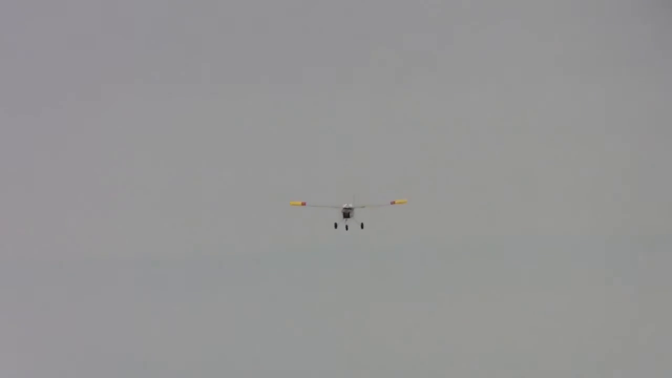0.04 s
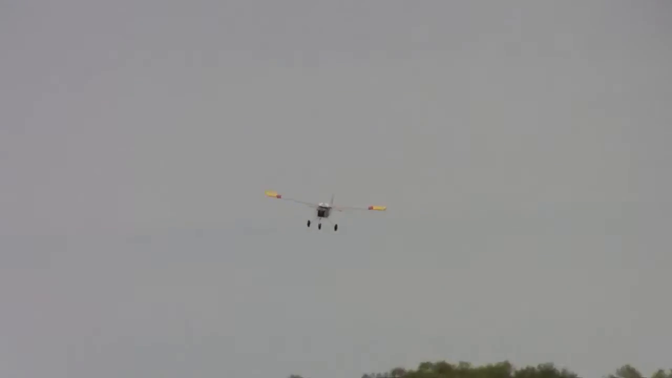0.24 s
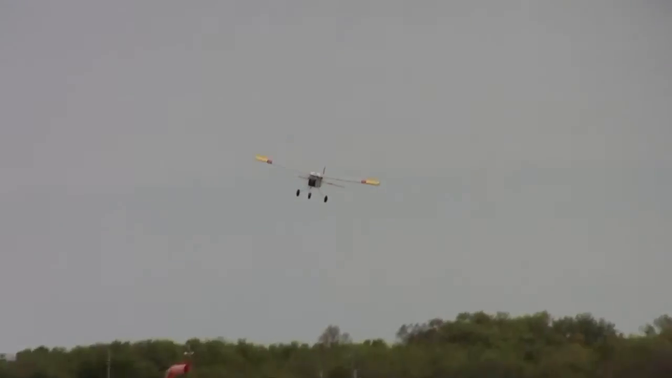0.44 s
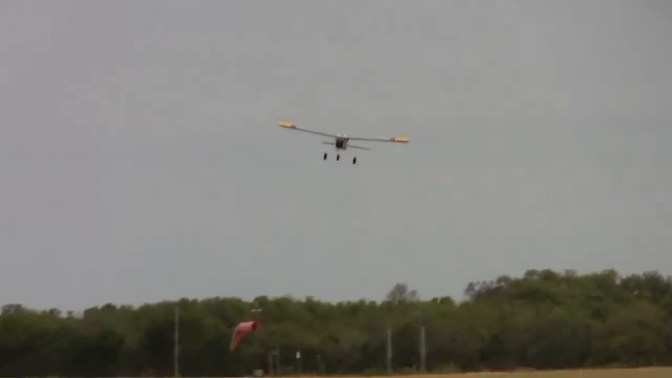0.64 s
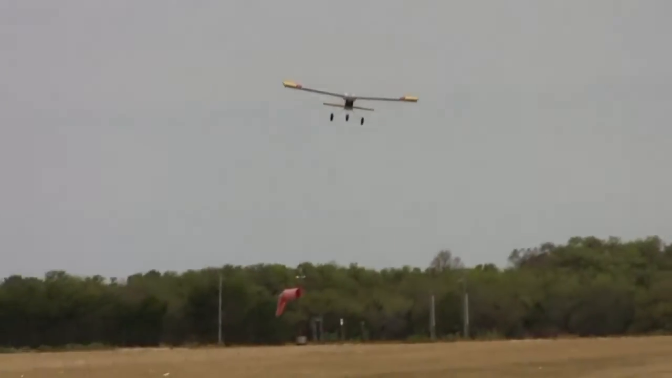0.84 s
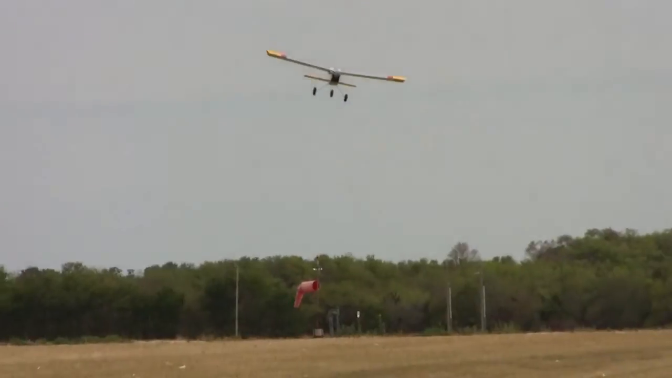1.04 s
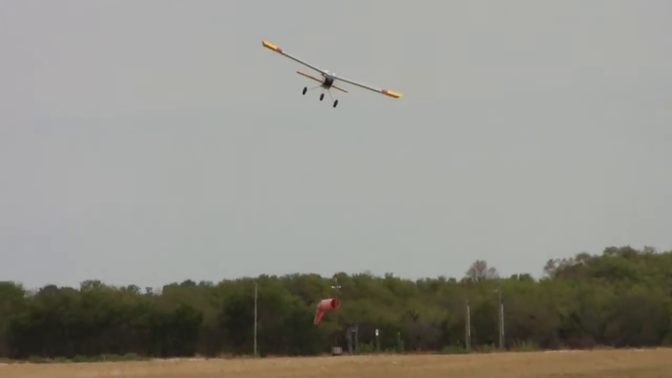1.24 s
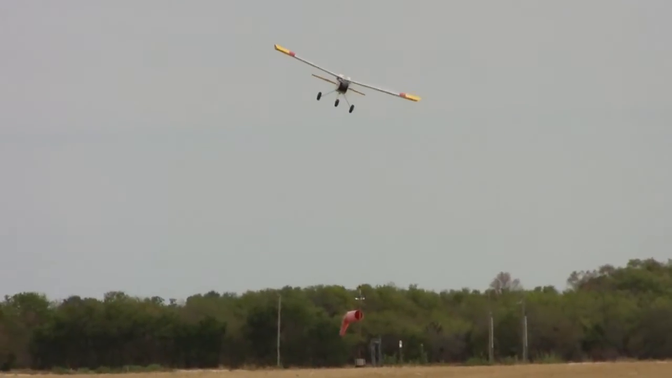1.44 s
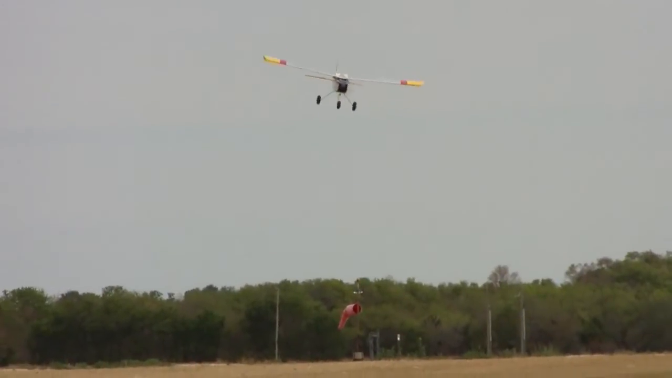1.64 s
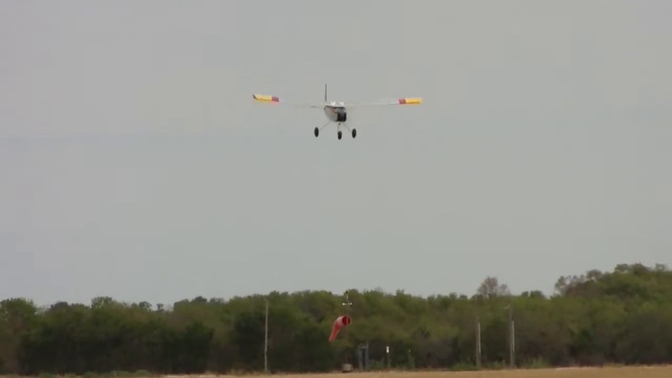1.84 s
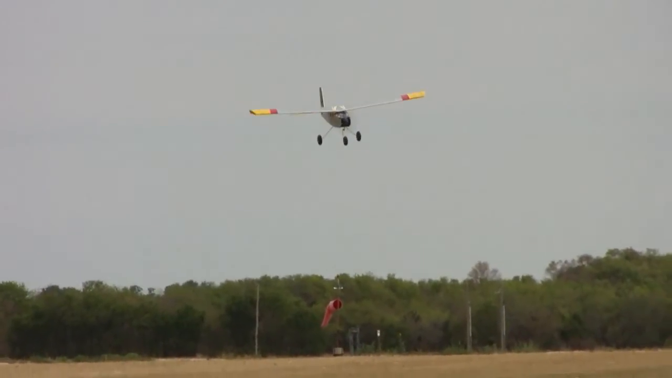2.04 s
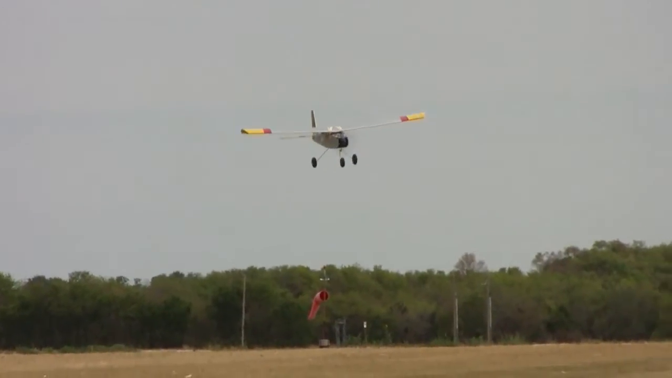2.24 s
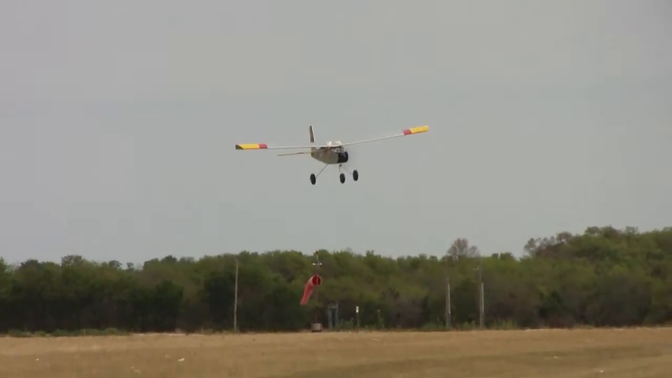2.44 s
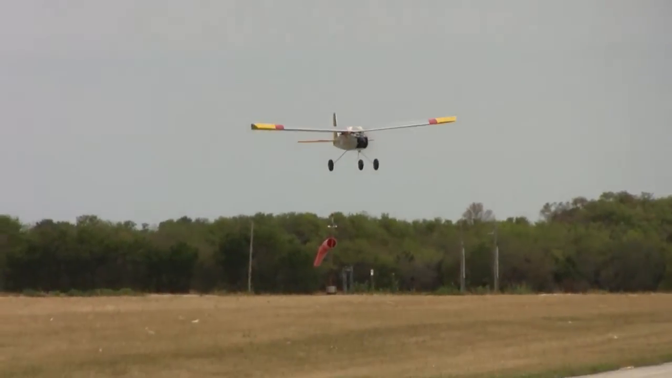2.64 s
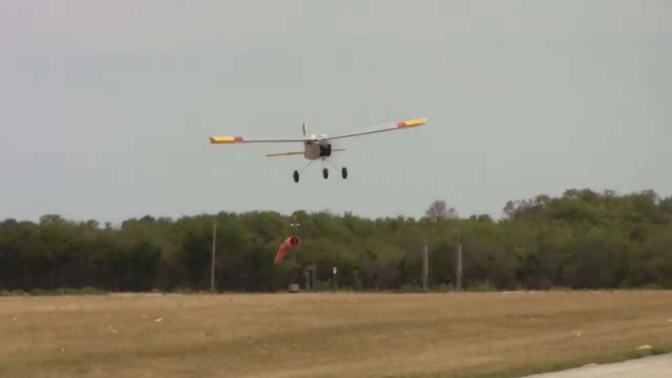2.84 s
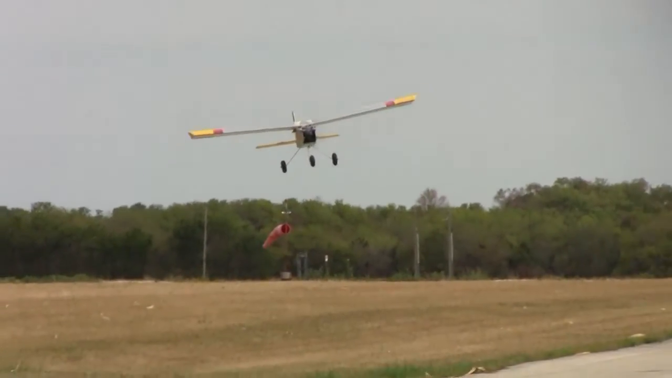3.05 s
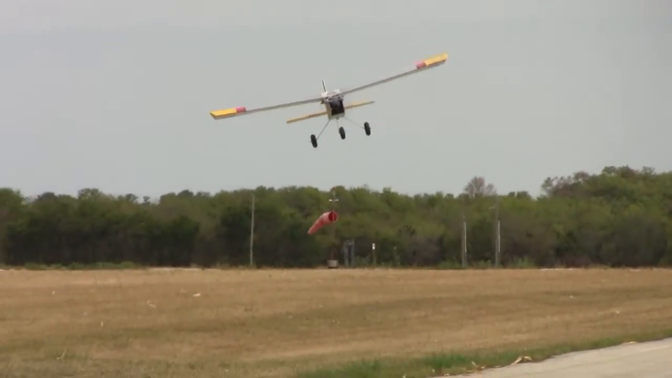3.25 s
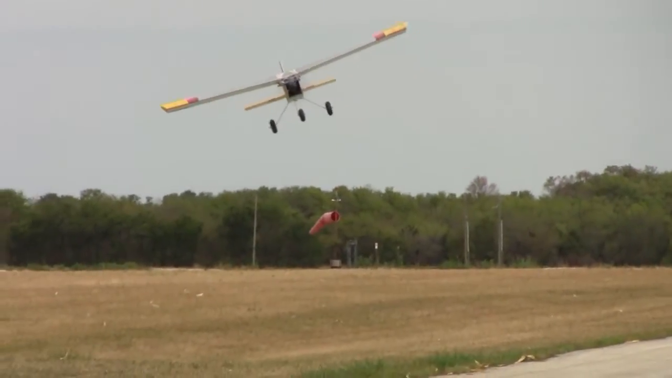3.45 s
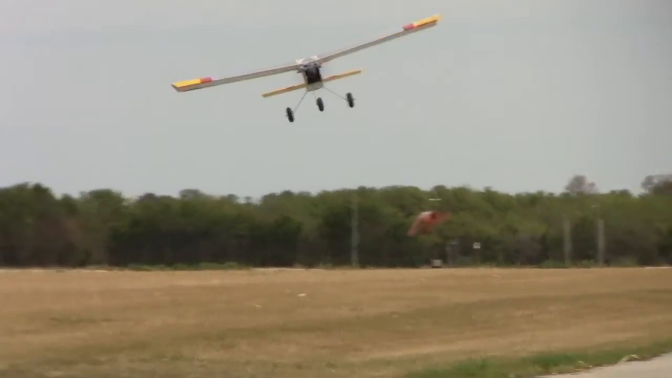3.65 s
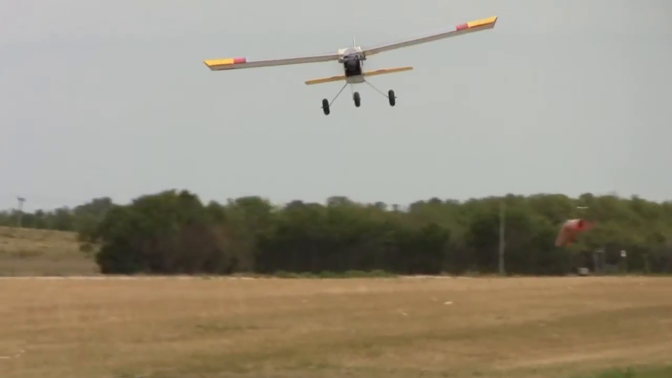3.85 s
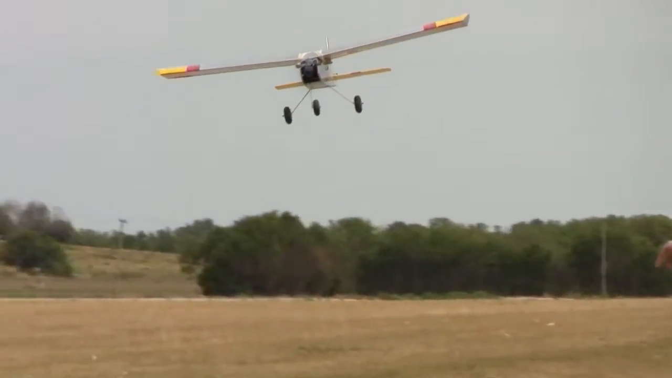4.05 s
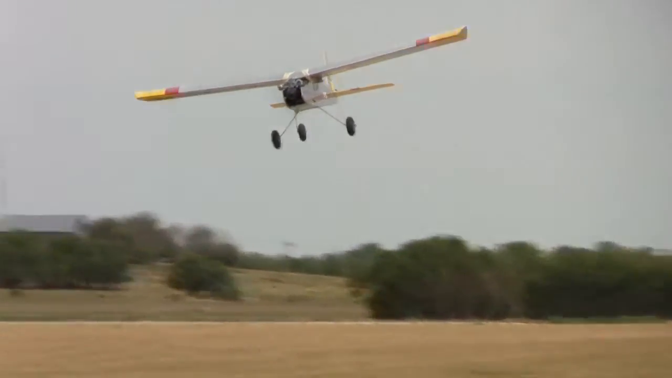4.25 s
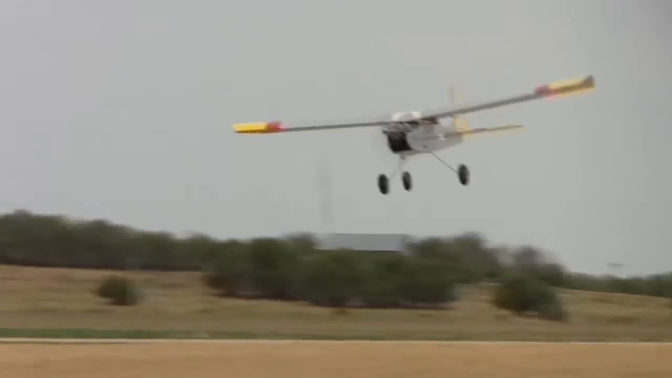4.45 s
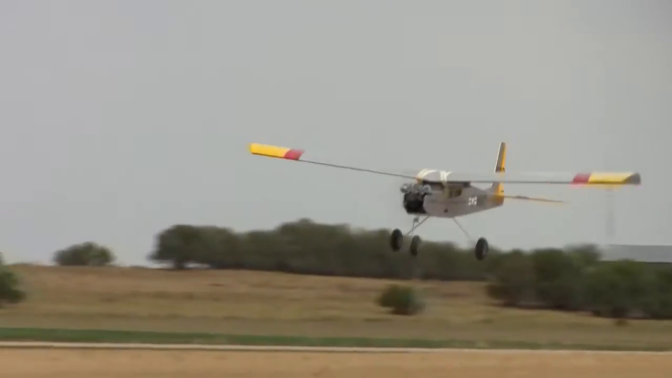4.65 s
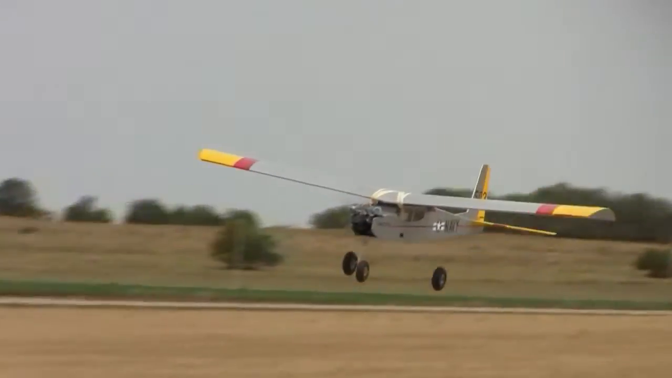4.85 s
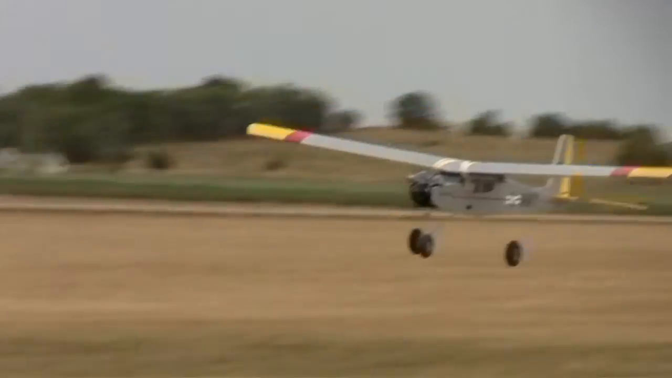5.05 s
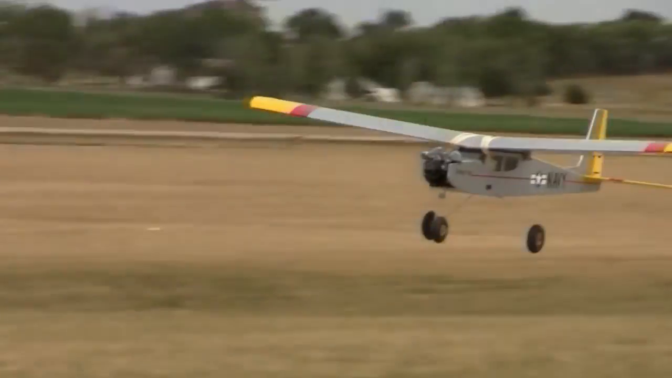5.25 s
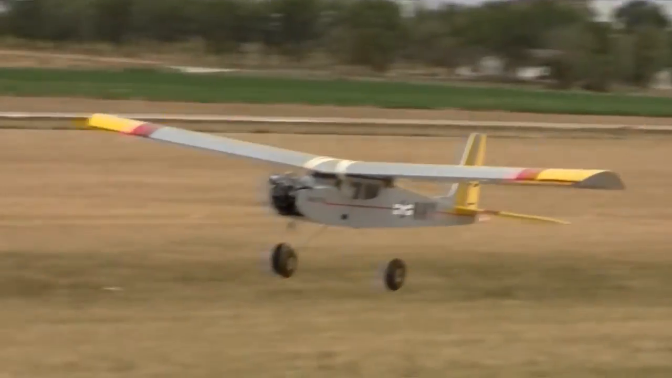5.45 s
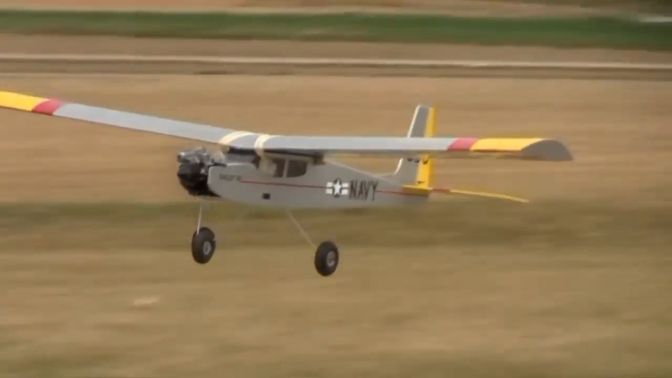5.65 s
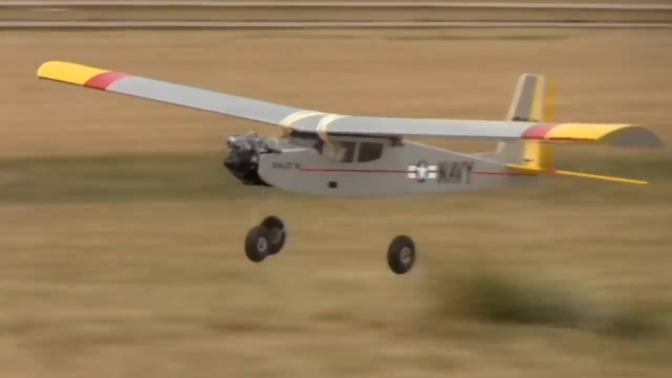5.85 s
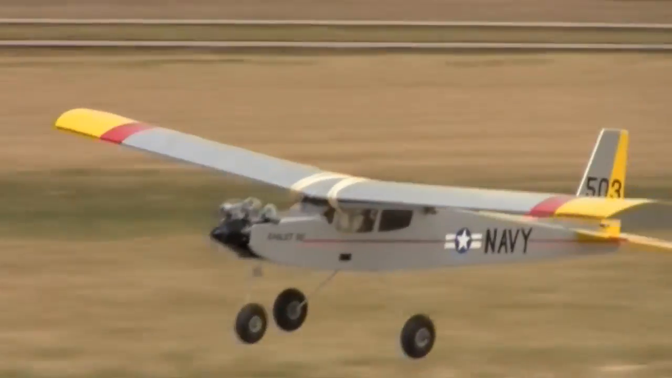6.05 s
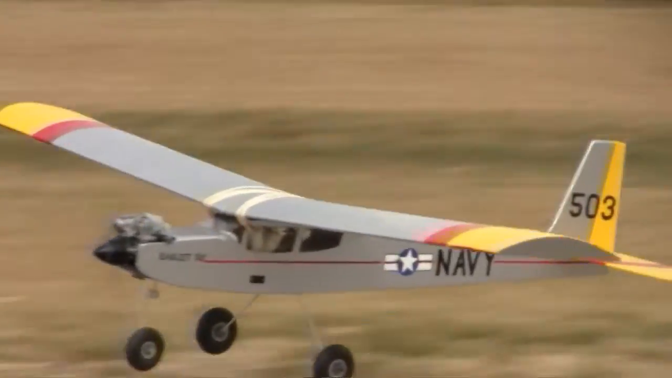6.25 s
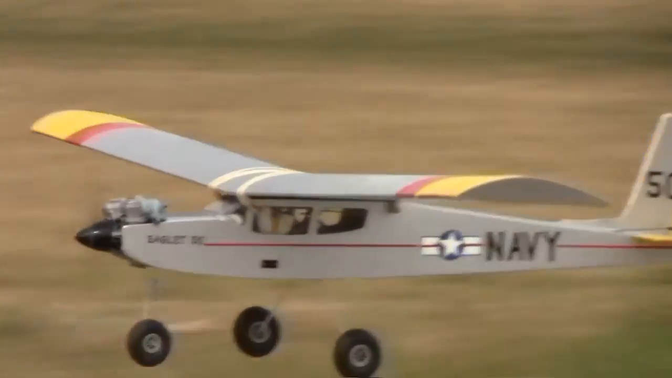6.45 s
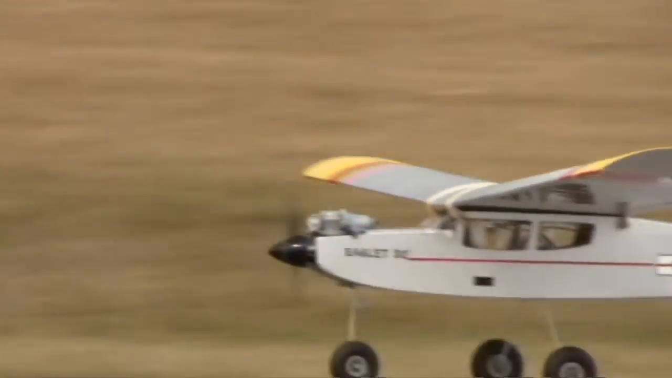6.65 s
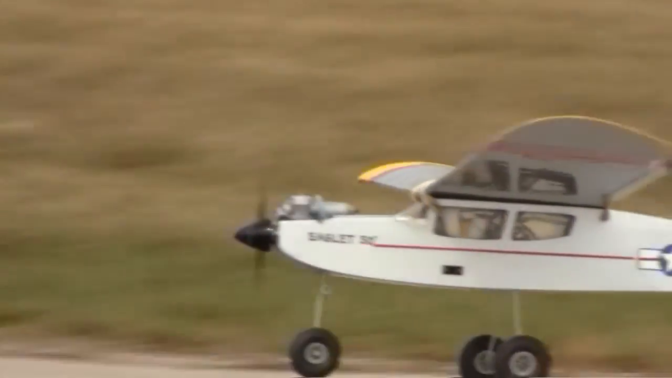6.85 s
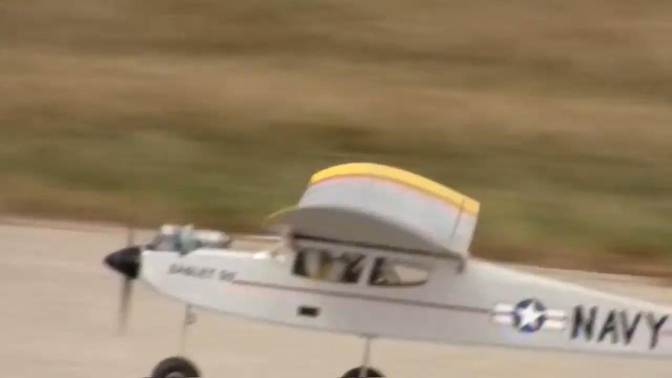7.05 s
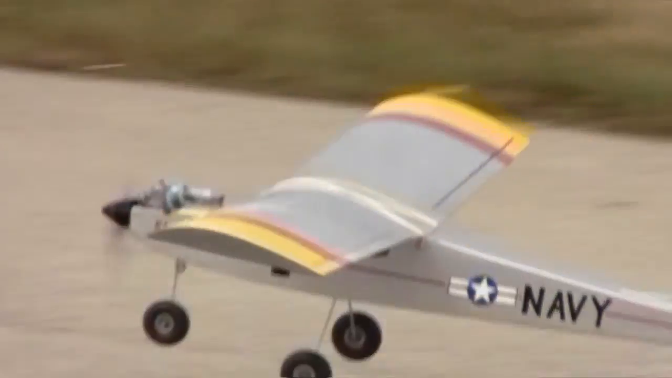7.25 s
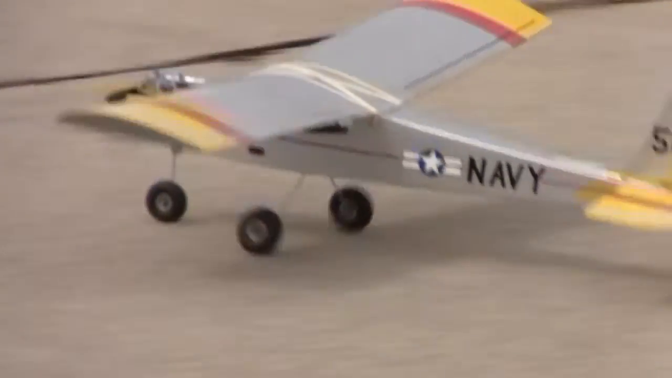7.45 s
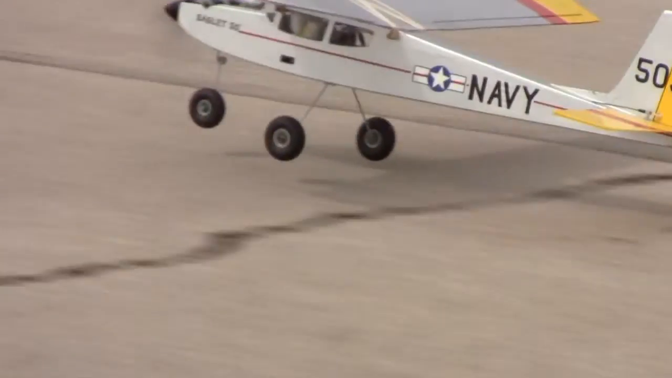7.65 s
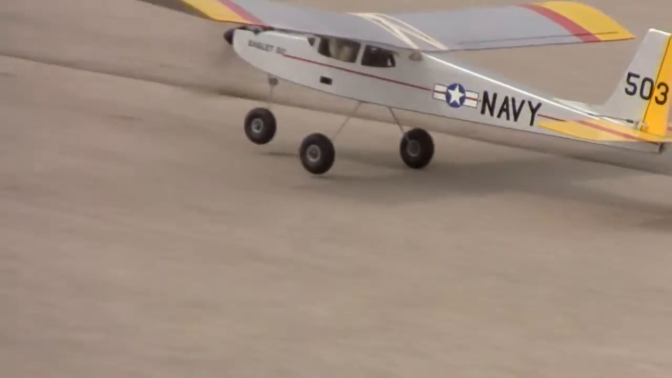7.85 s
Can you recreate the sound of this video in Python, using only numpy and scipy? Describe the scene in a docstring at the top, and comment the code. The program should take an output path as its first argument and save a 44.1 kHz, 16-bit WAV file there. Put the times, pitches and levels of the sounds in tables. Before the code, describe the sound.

A distant, nasal engine buzz with occasional weak firings comes closer outdoors, its drone sagging before a brief rev. Treble rasp, metallic ringing and a fluttering squeal emerge as the little plane flies past. Quick dry clicks and gritty tyre scuffs mark touchdown, a bounce and more knocks, with low wind rumble buffeting the microphone and the popping exhaust strong to the finish.

```python
"""Model airplane coming in to land

A model airplane with a throttled-back two-stroke glow engine glides in over a grass field and passes close by.
Each firing is a sharp exhaust pop doubled by its ground echo, and now and then one is weak. Sine multiples of
the crank speed drone below, filtered noise rasps, metal rings, and a blade whistles, swooping with every turn.
Struck modes make the wheels clatter on the concrete strip; shaped noise makes wind buffet the microphone."""
import sys
import numpy as np
from scipy import signal
from scipy.fft import rfft, irfft, next_fast_len
from scipy.io import wavfile
from scipy.ndimage import uniform_filter1d, map_coordinates

SR = 44100
rng = np.random.default_rng(int(sys.argv[2]) if len(sys.argv) > 2 else 0)


def digitize_waveform(pressure):
    """Quantize a signal to 16-bit integers and store it at the path in sys.argv[1].

    Rows of a 2-D input are taken as channels; values are limited to [-1, 1].
    """
    field = np.atleast_2d(pressure).T
    bounded = np.clip(field, -1, 1)
    quanta = np.round(bounded * 32767).astype(np.int16)
    wavfile.write(sys.argv[1], SR, quanta)


N = 348831
T = np.arange(N) / SR


def from_db(db):
    """Decibels to gain."""
    return 10 ** (np.asarray(db) / 20)


def rms_one(x):
    """Scale to rms 1."""
    return x / np.sqrt(np.mean(x ** 2) + 1e-20)


def even(x, size=5000):
    """Hold the rms over a window of size samples at 1, both sides together."""
    power = np.atleast_2d(x ** 2).mean(axis=0)
    return x / np.sqrt(uniform_filter1d(power, size=size) + 1e-12)


def in_time(rows):
    """Columns of a curve at every sample."""
    s, *columns = np.transpose(rows)
    return [np.interp(T, s, column) for column in columns]


def at_hz(points, hz):
    """Read a spectrum on a log-frequency axis."""
    f, value = np.transpose(points)
    return np.interp(np.log(np.maximum(hz, 1)), np.log(f), value)


def drift(rate):
    """Random curve of rms 1 through rate knots per second (400 at most)."""
    knots = rng.standard_normal(int(N / SR * 400) + 2)
    return rms_one(np.interp(T * rate, np.arange(len(knots)), knots))


def bell(s, half_s):
    """A bell-shaped bump in time, of height 1."""
    return np.exp(-.5 * ((T - s) / half_s) ** 2)


def swells(rows):
    """Bell-shaped swells of level."""
    return sum(from_db(db) * bell(s, half_s) for s, db, half_s in rows)


def ramp(start_s, rise_s):
    """Rise from 0 to 1 and stay."""
    return np.clip((T - start_s) / rise_s, 0, 1)


def low_pass(x, order, hz):
    """Butterworth low-pass."""
    return signal.sosfilt(signal.butter(order, hz, fs=SR, output="sos"), x)


def colour(x, spectrum, octaves=0):
    """Causal (minimum-phase) filter with the given spectrum, shifted by some octaves."""
    size = 2 * next_fast_len(N // 2 + 4096)
    hz = np.arange(size // 2 + 1) * SR / size
    log_gain = np.log(from_db(at_hz(spectrum, hz / 2 ** octaves)))
    # folding the cepstrum onto positive time gives minimum phase
    cepstrum = irfft(log_gain)
    cepstrum[1:size // 2] *= 2
    cepstrum[size // 2 + 1:] = 0
    return irfft(rfft(x, size) * np.exp(rfft(cepstrum)))[..., :N]


def resonance(x, hz, width_hz):
    """Two-pole band-pass with a peak gain of about 1."""
    r = np.exp(-np.pi * width_hz / SR)
    zeros = np.array([1, 0, -1]) * (1 - r * r) / 2
    poles = [1, -2 * r * np.cos(2 * np.pi * hz / SR), r * r]
    return signal.lfilter(zeros, poles, x + 1e-18)


def moving_resonance(x, hz, half_width_hz):
    """Band-pass whose centre follows a curve: shift down to 0 Hz, low-pass, shift back up."""
    carrier = np.exp(2j * np.pi * np.cumsum(hz) / SR)
    return np.real(carrier * low_pass(x / carrier, 2, half_width_hz))


def stereo_noise(spectrum, likeness, octaves=0):
    """Coloured noise of rms 1 whose two sides are alike by the given (Hz, coherence) table."""
    alike = np.clip(at_hz(likeness, np.arange(N // 2 + 1) * SR / N), -.95, .95)
    mid, side = rfft(rng.standard_normal((2, N)))
    pair = np.sqrt(1 + alike) * mid + np.sqrt(1 - alike) * side * [[1], [-1]]
    return rms_one(colour(irfft(pair, N), spectrum, octaves))


# Tone of the field's hush. Each row: frequency in Hz, level in dB.
HUSH_TONE = [(35, -66), (60, -32.5), (187, -2.5), (253, -5), (298, -1), (351, 2), (413, 4.5), (585, -0.5),
             (792, 1), (931, -3), (2100, -10), (2700, -13.5), (3670, -20), (15500, -37)]
# Left-right likeness of the hush. Each row: frequency in Hz, coherence from -1 to 1.
HUSH_LIKENESS = [(100, 0.99), (400, -0.28), (1000, -0.27), (3000, 0.36), (12000, 0.031)]
# Two brief swishes. Each row: centre in seconds, level in dB, half length in seconds.
SWISHES = [(2.97, -63.5, 0.015), (3.778, -56, 0.022)]
HUSH_DB = -53


def field():
    """The hush of the open field is steady coloured noise; band-passed noise swells into two brief swishes."""
    swish = swells(SWISHES) * rms_one(resonance(rng.standard_normal(N), 4800, 6000))
    return from_db(HUSH_DB) * stereo_noise(HUSH_TONE, HUSH_LIKENESS) + swish


# Lone light puffs. Each row: centre in seconds, level in dB, half length in seconds.
PUFFS = [(.17, -47, 0.025), (1.37, -46, 0.0087), (1.55, -61, 0.018), (1.95, -61, 0.018), (2.18, -61, 0.048),
         (3.44, -53, 0.01), (3.495, -49, 0.015), (4.54, -52, 0.033), (4.61, -57, 0.037), (4.91, -44, 0.009),
         (5.03, -48.5, 0.033), (5.135, -47, 0.014), (5.18, -44, 0.014), (5.225, -45.5, 0.023),
         (5.465, -48.5, 0.028), (5.525, -47, 0.019), (5.77, -52, 0.033), (5.94, -52, 0.027)]
# Tone of the light puffs. Each row: frequency in Hz, level in dB.
PUFF_TONE = [(10, -37), (25, -46), (60, -5), (110, 2), (180, 2.5), (300, -9), (600, -25), (2000, -73),
             (12000, -78)]
# Hard gusts on the microphone. Each row: centre in seconds, level in dB, half length in seconds.
GUSTS = [(6.73, -32, .01), (6.79, -30, .012), (6.829, -20.5, .004), (6.93, -26, .01), (6.958, -21, .009),
         (6.99, -24, .016), (7.054, -17.5, .006), (7.10, -27, .018), (7.2, -35, .03), (7.29, -23.5, .012),
         (7.33, -20, .011), (7.365, -23, .013), (7.405, -28, .018), (7.48, -22.5, .011),
         (7.575, -21.5, .016), (7.626, -12.5, .017), (7.67, -25, .015), (7.708, -13, .011),
         (7.742, -18, .016), (7.80, -21, .03), (7.878, -15.5, .03)]
# Tone of breeze and gusts. Each row: frequency in Hz, level in dB.
GUST_TONE = [(10, -55.5), (25, -43), (60, -19.5), (110, -6.5), (185, 0.5), (245, -3.5), (315, -4),
             (500, -16.5), (900, -23), (1800, -37), (2800, -61), (8000, -53), (16000, -76)]
# Left-right likeness of breeze and gusts. Each row: frequency in Hz, coherence from -1 to 1.
GUST_LIKENESS = [(40, 0.88), (100, 0.53), (300, -0.46), (900, -0.31), (3000, 0.59)]
BREEZE_S, BREEZE_RISE_S, BREEZE_DB = 6.63, .2, -29.8
# hard gusts sound higher: the shift, and the force that brings half of it
GUST_RISE_OCTAVES, GUST_HARD_DB = 0.29, -16.5
# faint stirring of the air: level at the start, growth, random spread
STIR_DB, STIR_DB_PER_S, STIR_SPREAD_DB = -79, 2.5, 7


def wind():
    """Lumpy turbulence on the microphone ports: light puffs, then a breeze with hard, higher-pitched gusts."""
    force = from_db(BREEZE_DB) * ramp(BREEZE_S, BREEZE_RISE_S) + swells(GUSTS)
    force = force * from_db(1.0 * drift(60))
    hard = force ** 2 / (force ** 2 + from_db(GUST_HARD_DB) ** 2)
    low, high = (stereo_noise(GUST_TONE, GUST_LIKENESS, shift) for shift in (0, GUST_RISE_OCTAVES))
    gusts = force * even((1 - hard) * low + hard * high, size=700)

    stir = from_db(STIR_DB + STIR_DB_PER_S * T + STIR_SPREAD_DB * drift(3.6))
    light = even(stereo_noise(PUFF_TONE, [(50, 0.87), (300, 0.052)]), size=1500)
    return gusts + (swells(PUFFS) + stir) * light


# Tyre scuffs. Each row: centre in seconds, level in dB, half length in seconds.
SCUFFS = [(6.9, -39.5, 0.023), (6.968, -41, 0.037), (7.567, -43, 0.036), (7.615, -38, 0.023)]
# Pitch of the tyres' grit. Each row: centre in Hz, width in Hz, gain in dB.
GRIT = [(1770, 530, 13.5), (3300, 810, -7)]
GRIT_PER_S, GRIT_SPREAD_DB = 1000, 3.5


def scuff():
    """Tyres scrub over grit as they touch: uneven small ticks through two resonances."""
    size_db = GRIT_SPREAD_DB * np.minimum(rng.exponential(1, N), 4)
    ticks = (rng.random(N) < GRIT_PER_S / SR) * rng.choice([-1, 1], N) * from_db(size_db)
    grit = sum(from_db(db) * resonance(ticks, hz, width) for hz, width, db in GRIT)
    return swells(SCUFFS) * rms_one(grit)


# Wheels and wire legs knocking.
# Each row: start in seconds, strength in dB, extra ring of the modes below 4 kHz in dB.
KNOCKS = [(6.852, -35, 6.5), (6.8775, -29, -2), (6.8965, -30, 6), (6.902, -24, 4), (6.9225, -30, 9),
          (6.941, -29, 11), (6.9555, -27, 14), (6.964, -36, 13), (6.969, -25, 17), (6.974, -37, 11),
          (6.989, -28, 12), (6.9955, -30, 8), (6.9975, -29, 12), (7.081, -38, 6), (7.5817, -25, 0),
          (7.608, -18.5, -2), (7.6471, -16.5, -5)]
# Modes of the undercarriage. Each row: frequency in Hz, level in dB, 60 dB decay time in seconds.
GEAR_MODES = [(940, -19, 0.018), (1625, -7, 0.016), (1840, -12.5, 0.031), (2980, -9.5, 0.0095),
              (3420, -16, 0.021), (4020, -7, 0.0044), (6300, 5, 0.00065)]


def wheels(click_db=5, crack_db=-8, click_top_hz=9000):
    """Each touch is a sharp click and a dry crack that set the undercarriage ringing."""
    s, db, ring_db = np.transpose(KNOCKS)
    at = (s * SR).astype(int)
    ringing = np.zeros(N)
    for hz, mode_db, t60 in GEAR_MODES:
        strike_db = db + mode_db + ring_db * (hz < 4000) + rng.normal(0, 1, len(at))
        strikes = np.zeros(N)
        strikes[at] = from_db(strike_db) * rng.choice([-1, 1], len(at))
        r, w = from_db(-60 / (t60 * SR)), 2 * np.pi * hz / SR
        ringing += signal.lfilter([0, np.sin(w)], [1, -2 * r * np.cos(w), r * r], strikes + 1e-18)
    blows = np.zeros(N)
    blows[at] = from_db(db)
    # the crack is noise dying away with a time constant of 4.6 ms
    decay = signal.lfilter([1], [1, -np.exp(-1 / (0.0046 * SR))], blows + 1e-18)
    crack = resonance(decay * rng.standard_normal(N), 2000, 3700)
    click = resonance(blows, 9600, 5300)
    return ringing + low_pass(from_db(crack_db) * crack + from_db(click_db) * click, 6, click_top_hz)


# the pass: moment of closest approach, distance then, speed over the ground
PASS_S, PASS_DISTANCE_M, FLIGHT_M_PER_S = 6.2, 6.9, 13
SOUND_M_PER_S = 343


def bearing():
    """Cosine of the angle the plane is seen from: 1 nose-on, 0 side-on, -1 tail-on."""
    ahead_m = FLIGHT_M_PER_S * (PASS_S - T)
    return ahead_m / np.hypot(ahead_m, PASS_DISTANCE_M)


def over_ground(x, lag_ms, share, grass_hz=11000):
    """Direct sound plus a dulled echo off the ground: a comb that moves with the echo's lag."""
    echo = low_pass(x, 1, grass_hz)
    late_echo = map_coordinates(echo, [(T - lag_ms / 1000) * SR], order=3)
    return x + np.minimum(share, 1) * late_echo


# Low drone of muffler and propeller at the reference exhaust level. Each row: frequency in Hz, level in dB.
DRONE_TONE = [(150, -77.5), (185, -62.5), (245, -65), (280, -68.5), (325, -64.5), (350, -61.5),
              (380, -62.5), (420, -62), (440, -59), (458, -61), (478, -58.5), (500, -56.5), (550, -115)]
# How far the drone follows the exhaust's swing in dB. Each row: frequency in Hz, share of the swing.
DRONE_FOLLOWS = [(165, 1.68), (185, 1.04), (250, 0.94), (300, 0.61), (345, 1.15), (400, 0.0052),
                 (455, 0.11), (520, 0.96)]
# Single drone tones swell or fade for a while.
# Each row: centre in seconds, rise in dB, half length in seconds, multiple of the crank speed.
TONE_SWELLS = [(.78, 15, 0.3, 3), (.7, -5, .5, 5), (2.3, 9.5, 0.55, 5), (4.02, 9, 0.055, 6),
               (4.2, 10, 0.055, 6), (4.5, -7, .15, 6), (3.1, 3, .3, 5), (5.1, 5.5, 0.25, 5),
               (5.2, 6, .35, 4), (6.35, -7, .4, 5), (6.2, -6, .5, 6), (6.9, 4, 0.32, 2)]
DRONE_REFERENCE_DB = -46.4


def drone(turns, speed, exhaust_db, waver_db=1.5):
    """Multiples 2 to 6 of the crank speed swell across the muffler's resonances and waver in the moving air."""
    out = 0
    for order in range(2, 7):
        hz = order * speed
        db = at_hz(DRONE_TONE, hz) + at_hz(DRONE_FOLLOWS, hz) * (exhaust_db - DRONE_REFERENCE_DB)
        db = db + waver_db * drift(18)
        db = db + sum(rise_db * bell(s, half_s) for s, rise_db, half_s, which in TONE_SWELLS
                      if round(which) == order)
        out = out + from_db(db) * np.sqrt(2) * np.sin(2 * np.pi * (order * turns + rng.random()))
    return out


# Tone of the intake and propeller rasp. Each row: frequency in Hz, level in dB.
RASP_TONE = [(300, 6), (1800, 18), (2400, 8.5), (3300, 7.5), (4500, 0), (7000, 0), (9000, 2), (10500, 6.5),
             (12100, -13.5), (13200, -11), (16000, -29)]


def rasp(turns, rasp_db, lag_ms, echo_share):
    """Intake and propeller rasp: coloured noise pulsing slightly once a turn, combed by its ground echo."""
    hiss = stereo_noise(RASP_TONE, [(2000, 1.0), (6000, 1.0), (11000, 0.77)])
    hiss = hiss * (1 + 0.037 * np.cos(2 * np.pi * turns))
    combed = np.array([over_ground(side, lag_ms, echo_share, grass_hz=18700) for side in hiss])
    return from_db(rasp_db) * even(combed)


# The metal ring swells now and then. Each row: centre in seconds, level in dB, half length in seconds.
RING_SWELLS = [(2.3, -80, 0.33), (3.1, -75.5, 0.54), (5.55, -58.5, 0.23)]
# pitch before Doppler shift, level against the rasp, its rise tail-on
RING_HZ, RING_DB, RING_BEHIND_DB = 5950, -18.5, 7


def metal_ring(rasp_db, behind, doppler):
    """The engine's metal rings: a sine with fluttering level and pitch, shifted by the Doppler effect."""
    gain = from_db(rasp_db + RING_DB + RING_BEHIND_DB * behind) + swells(RING_SWELLS)
    hz = RING_HZ * doppler + 40 * drift(200)
    return gain * drift(170) * np.sin(2 * np.pi * np.cumsum(hz) / SR)


# Whistle of a propeller blade. Each row: time in seconds, centre pitch in Hz, level in dB.
WHISTLE = [(1.2, 11000, -88), (1.9, 10900, -73), (2.3, 11500, -83), (2.8, 12100, -78), (3.1, 11500, -85),
           (3.4, 11450, -72), (3.8, 10600, -75), (4.3, 10300, -75), (4.65, 10400, -66), (4.78, 10750, -59),
           (4.95, 12300, -55), (5.2, 12550, -55), (5.45, 11900, -53), (5.78, 11050, -47),
           (6.03, 10800, -50), (6.3, 11100, -48), (6.7, 10700, -51), (7.0, 10800, -54),
           (7.28, 11000, -50.5), (7.5, 10600, -54), (7.7, 10550, -52), (7.91, 10700, -49)]
# The circling blade swings the pitch and beams it once a turn.
# Each row: time in seconds, pitch swing in Hz, beam's place in turns, beam depth in dB.
BLADE = [(1.5, 250, .2, 3), (4.7, 400, .1, 3), (5.1, 850, 0, 3), (5.75, 750, -.12, 4), (6.25, 950, -.14, 3),
         (6.7, 1000, -.12, 3), (7.1, 1100, .45, 2.5), (7.4, 900, .38, 6), (7.8, 700, .36, 8)]
# Faint narrow treble bands early in the approach, where the ground echo reinforces the hiss.
# Each row: centre in seconds, level in dB, half length in seconds, pitch ratio to the whistle.
FAR_BANDS = [(1.9, -78, 0.24, 0.825), (1.9, -85.5, 0.15, 1.115)]
WHISTLE_FLUTTER_DB, WHISTLE_AIR_SHARE = 2.2, .55


def whistle(turns, wander_hz=170, fray_hz=1000, port_lag_ms=0.0022, airy_width_hz=650, airy_below_hz=200):
    """A propeller blade squeals: pitch swings as it circles, loudest where it points at the listener."""
    centre_hz, level_db = in_time(WHISTLE)
    swing_hz, beam_turns, beam_db = in_time(BLADE)
    hz = centre_hz + swing_hz * np.sin(2 * np.pi * turns) + wander_hz * drift(300)
    # turbulence frays the tone
    phase = 2 * np.pi * np.cumsum(hz + fray_hz * rng.standard_normal(N)) / SR
    flutter_db = WHISTLE_FLUTTER_DB * drift(400)
    beam = np.sqrt(2) * even(from_db(flutter_db + beam_db * np.cos(2 * np.pi * (turns - beam_turns))))
    # the far bands borrow the whistle's frayed phase
    far_bands = sum(from_db(db) * bell(s, half_s) * np.sin(ratio * phase) for s, db, half_s, ratio in FAR_BANDS)
    squeal = np.sqrt(1 - WHISTLE_AIR_SHARE ** 2) * from_db(level_db) * np.sin(phase)
    tone = beam * (squeal + far_bands)
    # so short a wave reaches the two microphone ports out of step
    bins_hz = np.arange(N // 2 + 1) * SR / N
    late = irfft(rfft(tone) * np.exp(-2j * np.pi * bins_hz * port_lag_ms / 1000), N)
    # an airy band of hiss surrounds the squeal
    flicker = low_pass(rng.standard_normal((2, N)), 2, airy_width_hz)
    band = rms_one(flicker * np.sin(2 * np.pi * np.cumsum(centre_hz - airy_below_hz) / SR))
    airy = from_db(level_db) * band
    return (np.array([tone, late]) + WHISTLE_AIR_SHARE * airy) * from_db([[-.7], [.7]])


# Weak firings of the throttled engine. Each entry: time in seconds.
MISFIRES = [1.725, 3.336, 3.397, 3.735, 3.922, 4.012, 4.118, 4.222, 4.38, 4.518, 4.573, 5.203, 5.80, 5.886]
MISFIRE_DB = -10  # against a full firing


def firings(turns, uneven_db, jitter_s):
    """One click per turn of the crank, uneven in strength and timing; misfires are weak."""
    when = np.interp(np.arange(1, int(turns[-1])), turns, T)
    chance = rng.standard_normal((len(when), 2))
    db = uneven_db * chance[:, 1]
    db[[np.argmin(np.abs(when - s)) for s in MISFIRES]] += MISFIRE_DB
    at = ((when + jitter_s * chance[:, 0]) * SR).astype(int)
    clicks = np.zeros(N)
    clicks[np.clip(at, 0, N - 1)] = from_db(db)
    return rms_one(clicks)


# Tone of an exhaust pop. Each row: frequency in Hz, level in dB.
POP_TONE = [(80, -40), (300, 3), (500, 8.5), (620, 5.5), (800, -2), (1100, 13.5), (1550, 1), (1950, 3),
            (2230, -8), (2480, -18), (3200, -54), (4200, -19), (7000, -18), (15000, -65)]
# Muffler and airframe ring on after each pop. Each row: centre in Hz, width in Hz, gain in dB.
BODY = [(801.4, 55, 17.5), (1060, 75, -14), (1501, 133, 8), (2195, 590, 0.5)]
# a weaker second puff in every turn; the gas rushes hardest just after each pop
AFTERPUFF_TURNS, AFTERPUFF_DB, GAS_DECAY_TURNS = 0.38, -13, .35
BARK_HALF_WIDTH_HZ = 325


def exhaust(turns, lag_ms, gas_db, bark_db, bark_hz, echo_share):
    """Pops, afterpuffs and churning gas, rung through the body and doubled by the ground."""
    gas = rms_one(rng.standard_normal(N) * (.5 + np.exp(-(turns % 1) / GAS_DECAY_TURNS)))
    clicks = firings(turns, uneven_db=.6, jitter_s=.00002)
    afterpuffs = firings(turns - AFTERPUFF_TURNS, uneven_db=2, jitter_s=.00005)
    blast = clicks + from_db(AFTERPUFF_DB) * afterpuffs + from_db(gas_db) * gas
    blast = blast + sum(from_db(db) * resonance(blast, hz, width) for hz, width, db in BODY)
    # the muffler's upper resonance barks only towards some directions
    bark = moving_resonance(blast, bark_hz, BARK_HALF_WIDTH_HZ)
    pops = colour(blast, POP_TONE) + from_db(bark_db) * bark
    return even(over_ground(pops, lag_ms, echo_share), size=9000)


# Crank speed as heard. Each row: time in seconds, firings per second.
SPEED = [(0.0, 99.5), (0.44, 98.3), (0.78, 109.6), (1.0, 102.2), (1.21, 100.4), (1.54, 91.4), (2.14, 89.2),
         (2.4, 92.1), (2.88, 86.5), (3.12, 82.0), (3.25, 84.3), (3.74, 81.5), (4.01, 76.5), (4.18, 76.7),
         (4.3, 73.3), (4.42, 75.0), (4.68, 74.1), (4.92, 94.6), (5.2, 94.8), (5.8, 82.7), (6.13, 82.3),
         (6.24, 84.4), (6.52, 82.7), (6.67, 83.9), (7.15, 81.0), (7.29, 81.6), (7.4, 77.6), (7.55, 72.0),
         (7.7, 72.3), (7.8, 75.0), (7.91, 77.0)]
# Loudness of the exhaust. Each row: time in seconds, level in dB.
EXHAUST_LEVEL = [(0, -60), (.4, -62.5), (.75, -58.5), (1.25, -59.5), (2.0, -55), (2.7, -52.5),
                 (3.25, -54.5), (3.95, -48.5), (4.7, -46), (5.38, -40.5), (5.58, -43), (6.25, -36.5),
                 (6.8, -35), (7.35, -39), (7.91, -31.5)]
# Loudness of the rasp. Each row: time in seconds, level in dB.
RASP_LEVEL = [(0, -92), (1.2, -106), (1.9, -63), (3.1, -64), (3.7, -55.5), (4.65, -54.5), (4.9, -47),
              (5.5, -46), (6.8, -42.5), (7.91, -51.5)]
# Lag of the intake's echo off the ground. Each row: time in seconds, lag in ms.
ECHO_LAG = [(0, .34), (1.1, .42), (1.35, .54), (1.75, .555), (2.7, .475), (3.4, .49), (3.8, .59),
            (4.3, .72), (4.75, .75), (5.25, .69), (5.8, .83), (6.1, 1.02), (6.7, 1.02), (7.05, .68),
            (7.16, .53), (7.3, .39), (7.5, .29), (7.91, .29)]
# Churning gas against the pops, roughest as the plane comes close. Each row: time in seconds, level in dB.
GAS_LEVEL = [(0, -12), (3.3, -14), (4.2, -13.5), (5.0, -11.5), (5.8, -11), (6.2, -3), (6.7, -2.5),
             (7.2, -3), (7.91, -4)]
# The muffler's bark flares up and shifts. Each row: time in seconds, rise in dB, pitch in Hz.
BARK_FLARE = [(3.0, 4, 3450), (3.55, 7, 3300), (3.95, 10, 3180), (4.24, 11, 3130), (4.3, 6, 2840),
              (5.5, 6, 2880), (5.85, 2, 3300), (6.2, 7, 3070)]
BARK_DB, BARK_BEHIND_LOSS_DB = -6.5, 25
# uneven crank: spread of its angle (turns), changes per s, angle at the start (turns)
CRANK_WAVER, CRANK_WAVER_PER_S, CRANK_START = .012, 18, .12
# exhaust echo: strength, loss side-on; the muffler sits lower than the intake, so its echo comes sooner
POP_ECHO_SHARE, POP_ECHO_ABEAM_LOSS, MUFFLER_LEAD_MS = 1, 0.073, 0.019
# treble echo: strength side-on, gain at a grazing angle, spread over patchy ground
ECHO_SHARE, ECHO_GRAZING_SHARE, ECHO_PATCHY_DB = .09, .42, 3


def engine():
    """Exhaust, drone, rasp, metal ring and whistle, driven by the crank and the angle of the pass."""
    speed, = in_time(SPEED)
    exhaust_db, = in_time(EXHAUST_LEVEL)
    rasp_db, = in_time(RASP_LEVEL)
    lag_ms, = in_time(ECHO_LAG)
    gas_db, = in_time(GAS_LEVEL)
    flare_db, bark_hz = in_time(BARK_FLARE)
    turns = CRANK_START + np.cumsum(speed) / SR + CRANK_WAVER * drift(CRANK_WAVER_PER_S)
    facing = bearing()
    abeam, behind = 1 - facing ** 2, np.maximum(-facing, 0)
    doppler = 1 / (1 - facing * FLIGHT_M_PER_S / SOUND_M_PER_S)

    bark_db = BARK_DB - BARK_BEHIND_LOSS_DB * behind + flare_db
    pop_share = POP_ECHO_SHARE - POP_ECHO_ABEAM_LOSS * abeam
    pops = exhaust(turns, lag_ms - MUFFLER_LEAD_MS, gas_db, bark_db, bark_hz, pop_share)
    pops = from_db(exhaust_db) * pops

    share = (ECHO_SHARE + ECHO_GRAZING_SHARE * facing ** 8) * from_db(ECHO_PATCHY_DB * drift(9))
    treble = rasp(turns, rasp_db, lag_ms, share)
    ring = metal_ring(rasp_db, behind, doppler)
    squeal = np.array([over_ground(side, lag_ms, share, grass_hz=19400) for side in whistle(turns)])
    squeal = squeal / np.hypot(1, share)  # offsets the power that the echo adds
    return (pops + drone(turns, speed, exhaust_db) + treble + ring + squeal) * from_db([[-.4], [.4]])


def scene():
    """Field, wind, wheels and plane."""
    return field() + wind() + scuff() + wheels() + engine()


def record(dry):
    """The top is cut steeply above 15.5 kHz."""
    return signal.sosfilt(signal.ellip(10, .1, 80, 15500, fs=SR, output="sos"), dry)


dry = scene()
out = record(dry)
digitize_waveform(out)
```